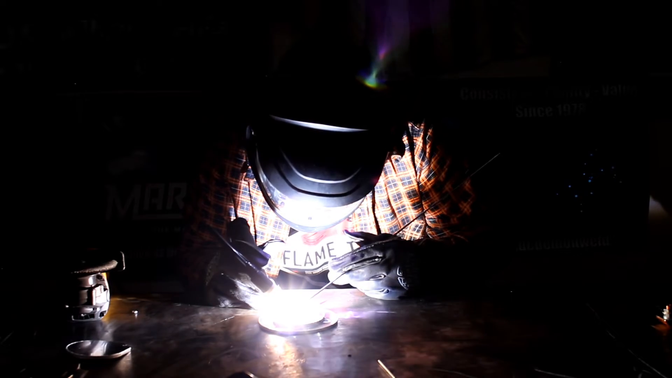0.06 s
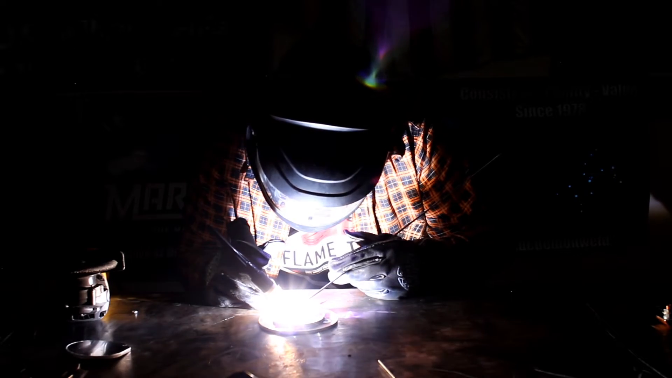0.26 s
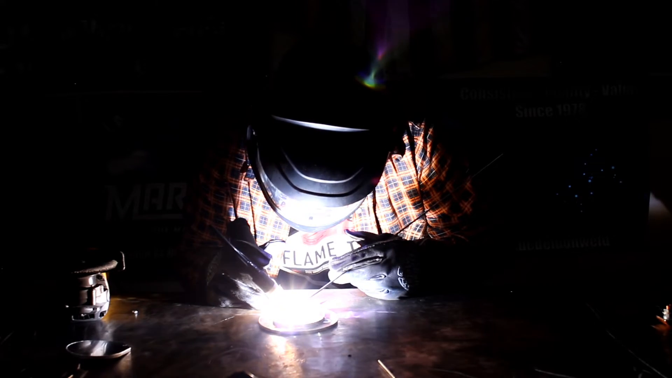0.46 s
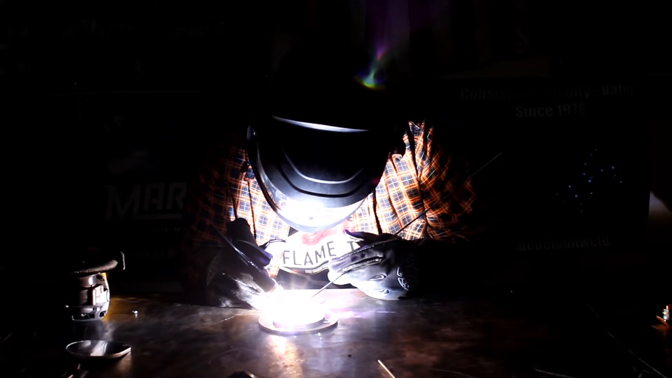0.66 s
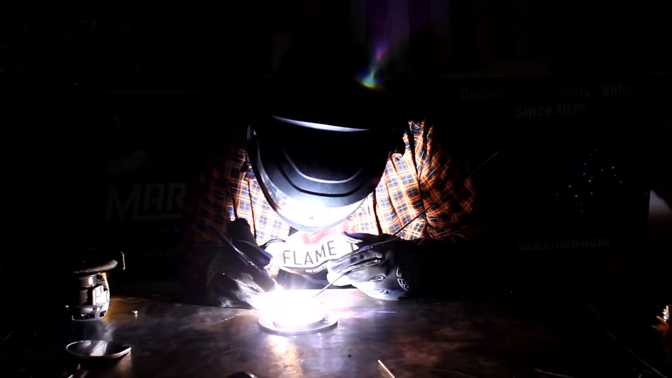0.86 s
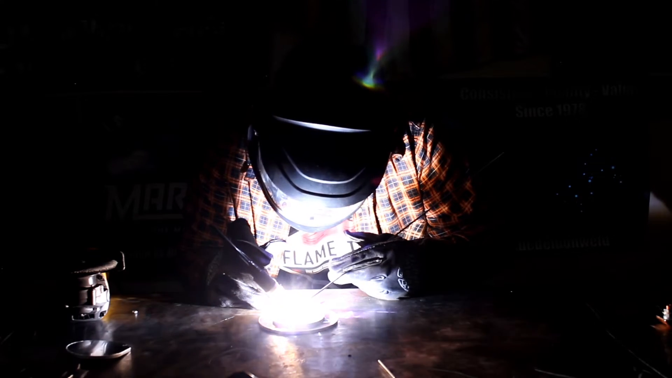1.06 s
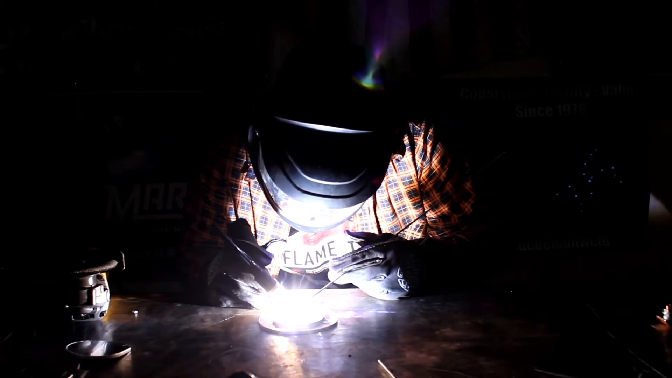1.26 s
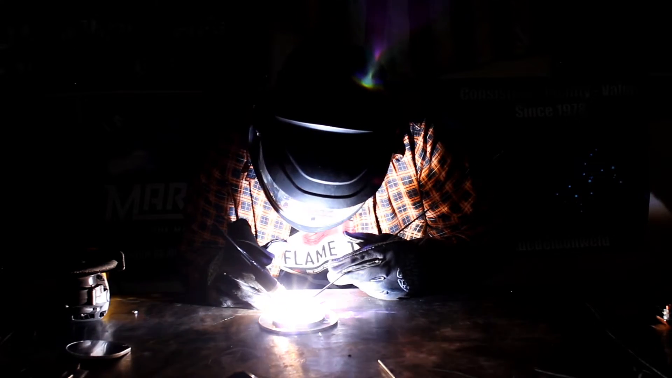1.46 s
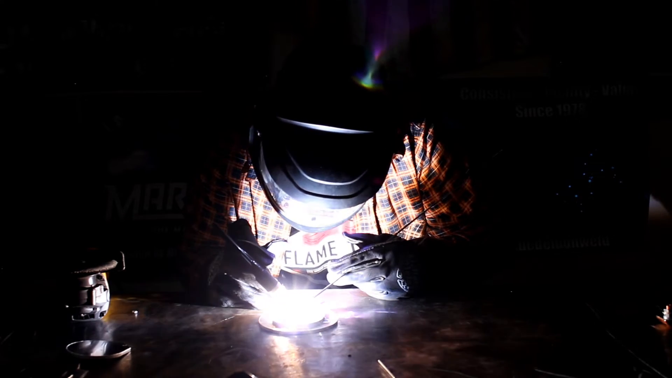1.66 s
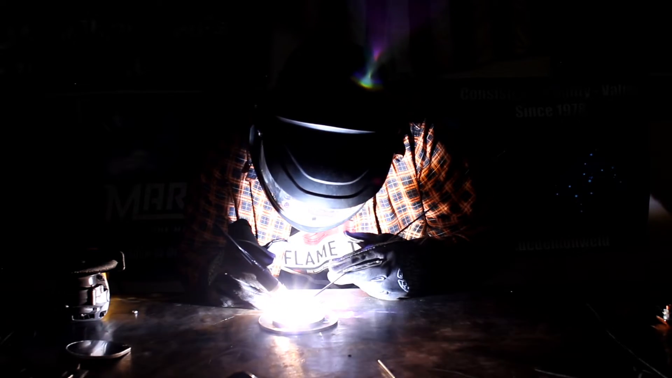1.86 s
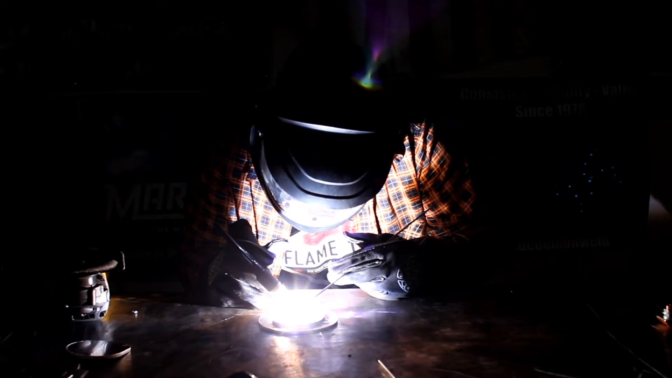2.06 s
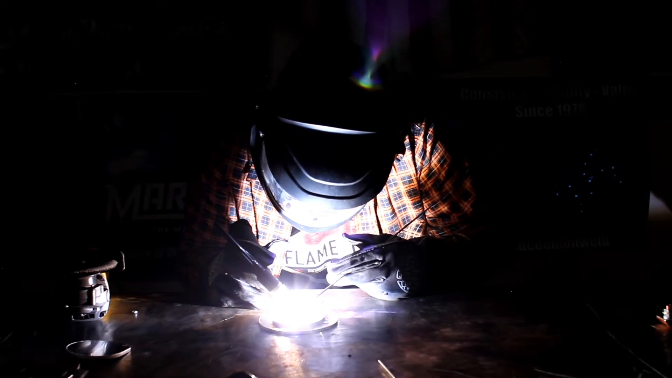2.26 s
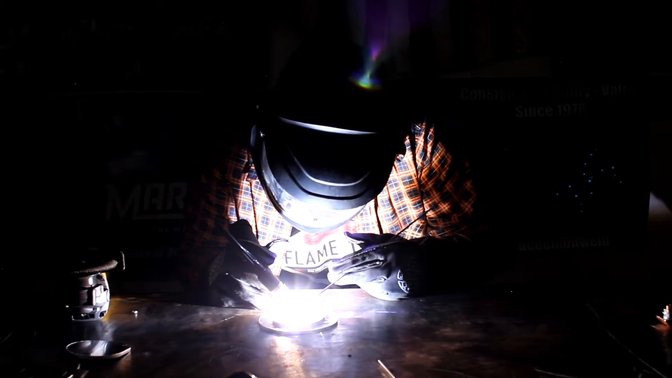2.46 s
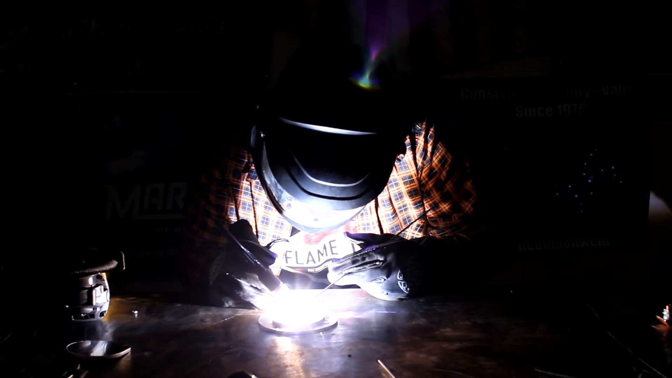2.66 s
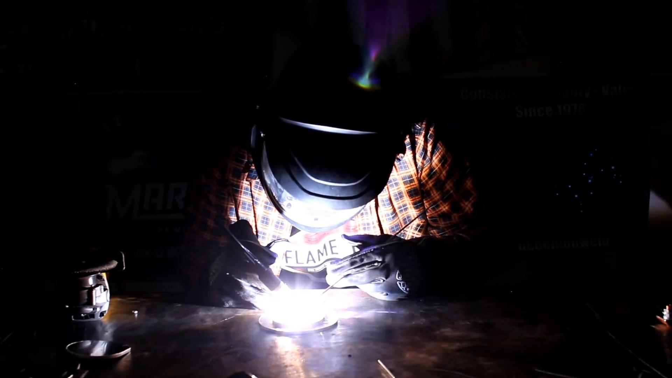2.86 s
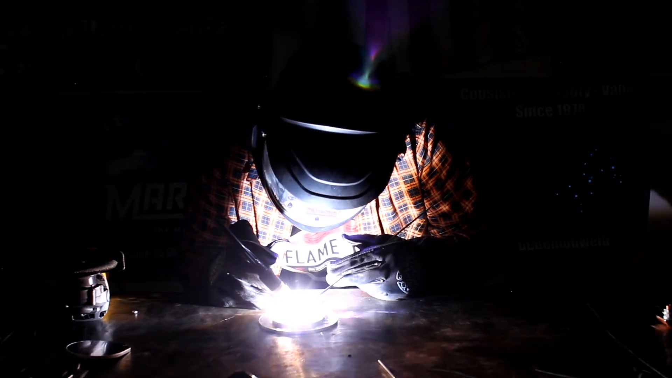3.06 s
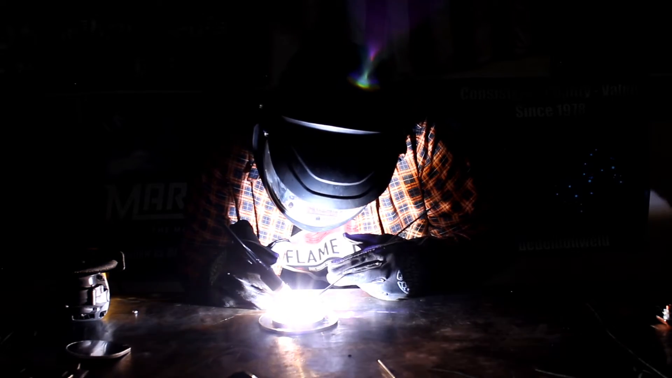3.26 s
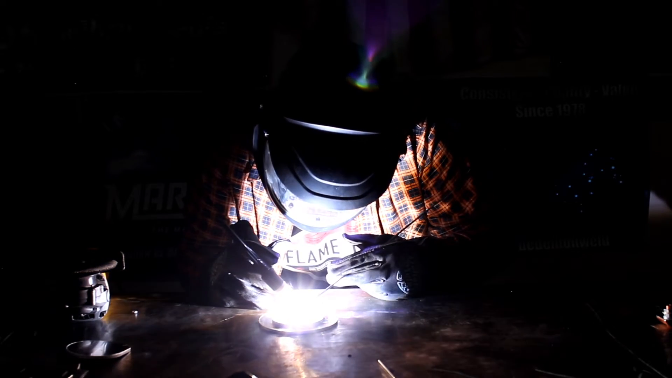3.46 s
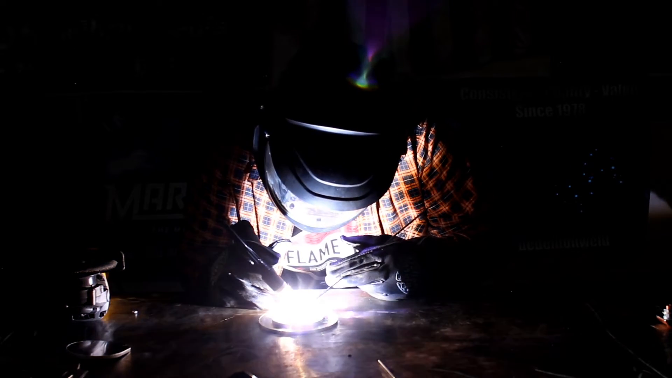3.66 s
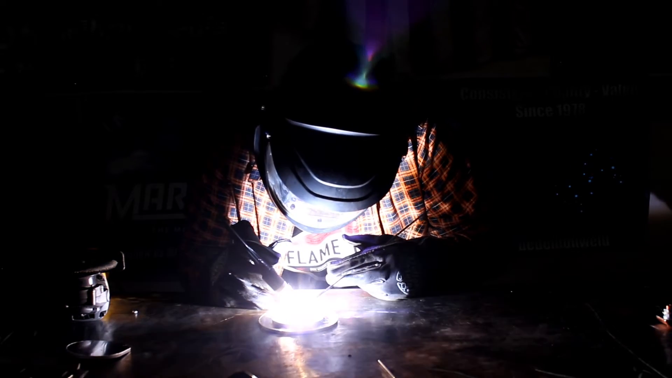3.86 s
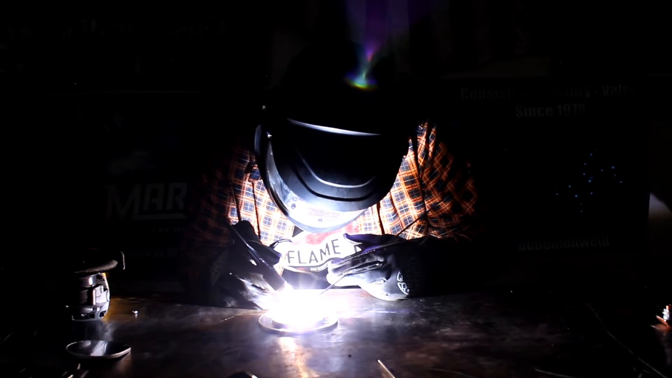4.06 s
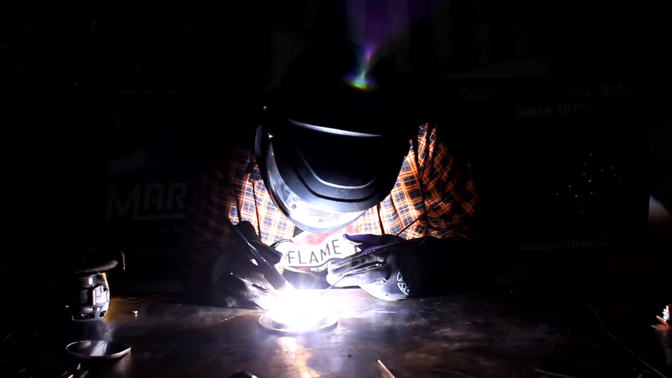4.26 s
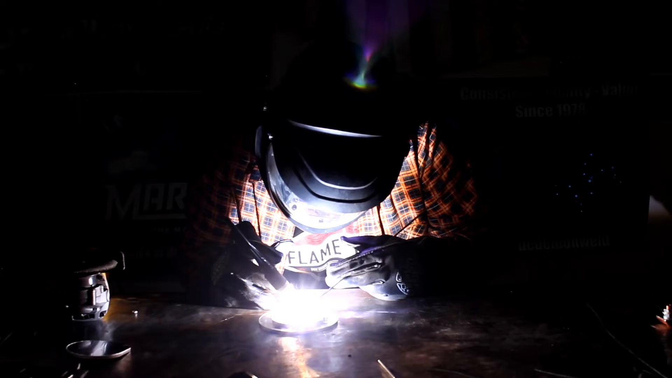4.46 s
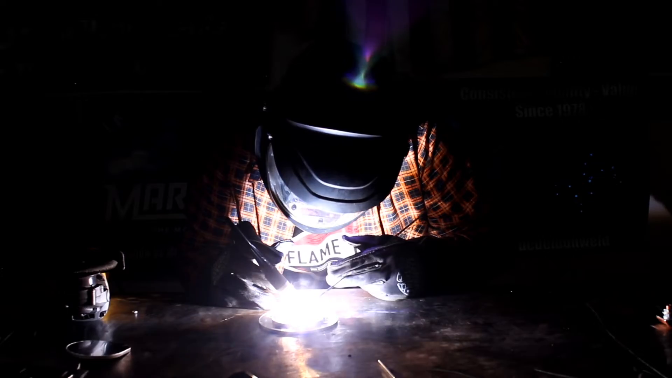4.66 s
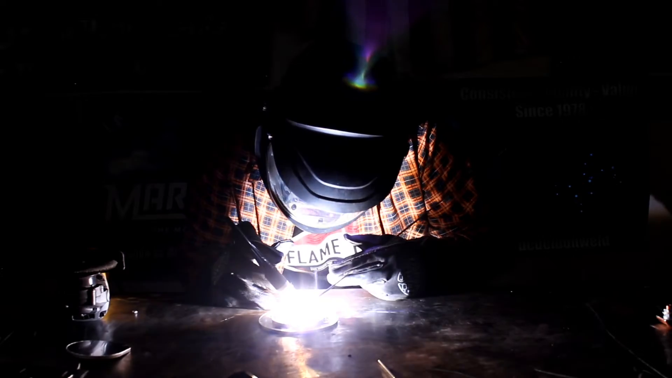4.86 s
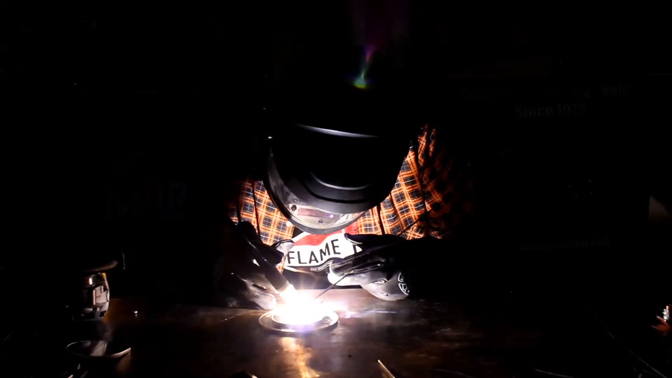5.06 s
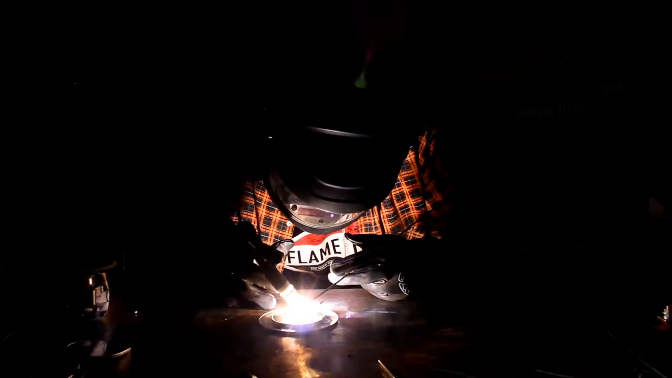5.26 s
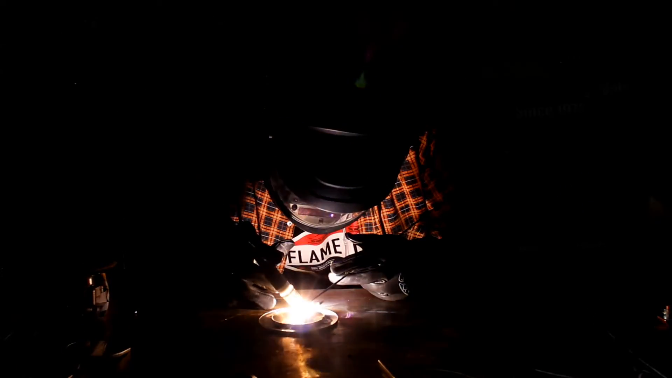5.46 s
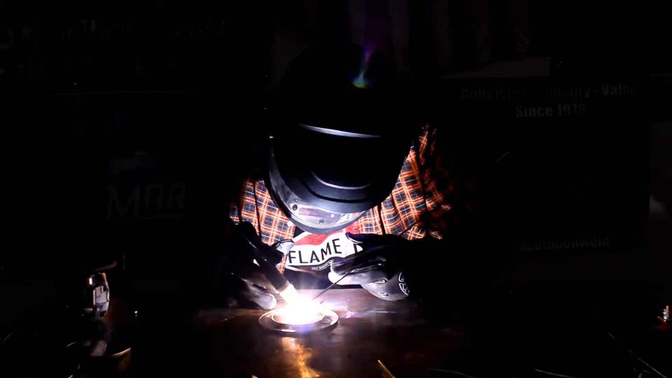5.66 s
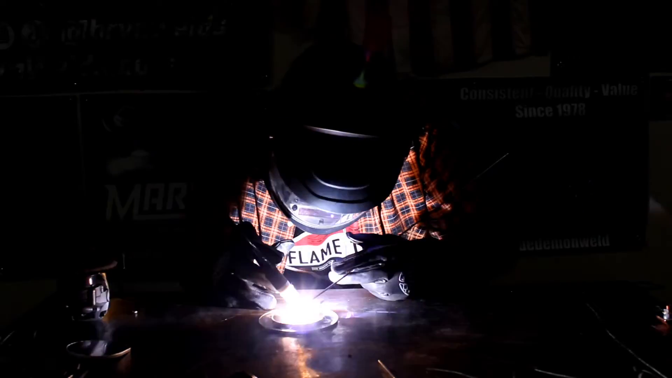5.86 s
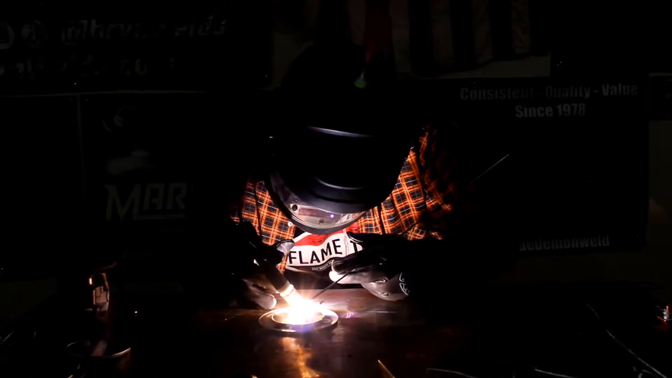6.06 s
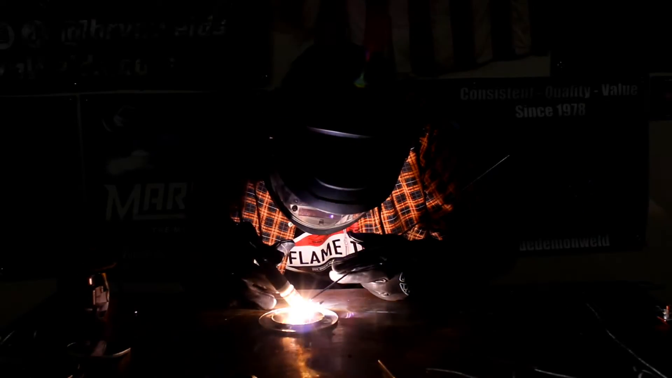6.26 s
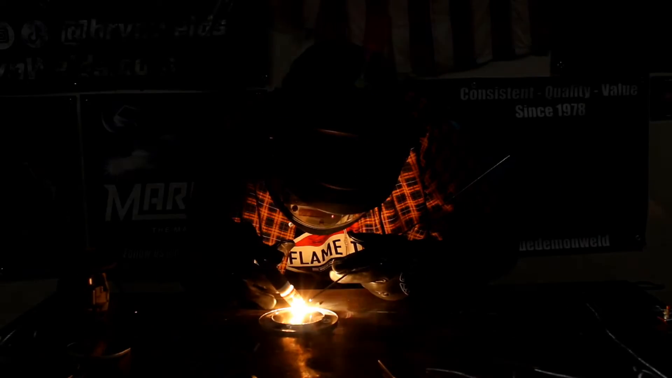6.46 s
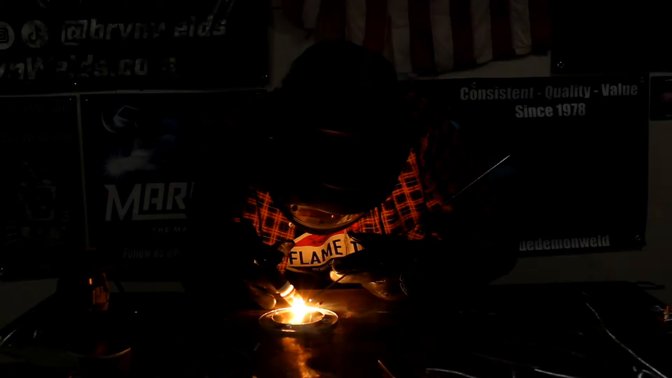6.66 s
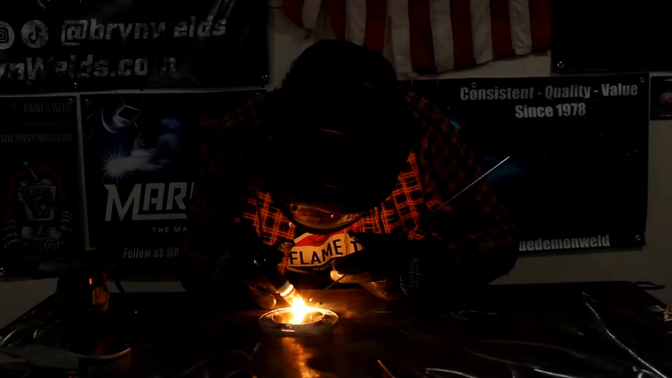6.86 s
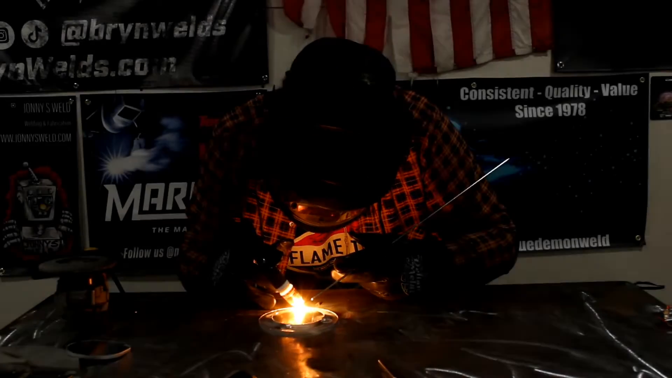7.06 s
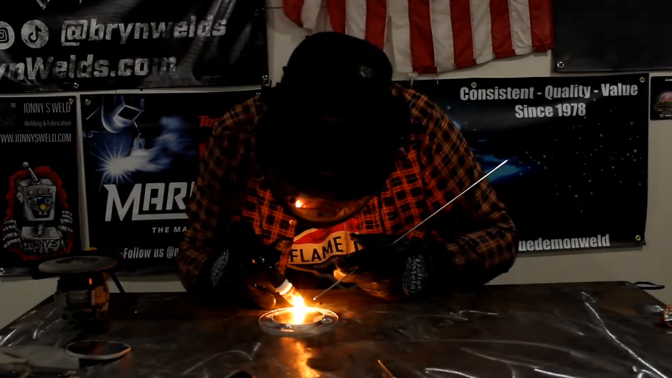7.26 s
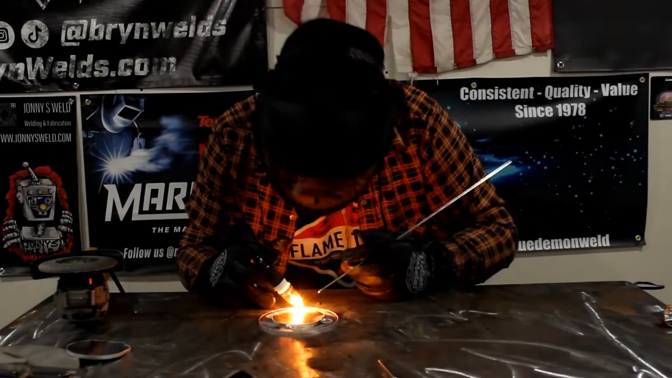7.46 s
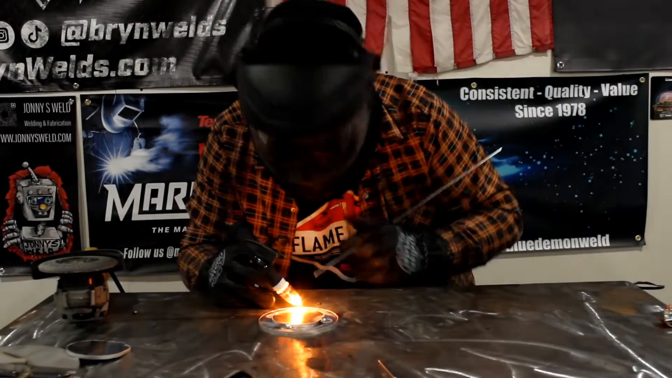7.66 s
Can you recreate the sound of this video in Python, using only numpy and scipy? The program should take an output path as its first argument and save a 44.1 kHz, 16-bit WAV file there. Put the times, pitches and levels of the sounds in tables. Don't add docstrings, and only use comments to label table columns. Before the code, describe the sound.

Close in a workshop, an electric arc buzzes continuously, hard-edged and metallic, dipping slightly now and then, with scattered pops. It suddenly weakens into a hollow, irregular sputter full of loud spitting sparks, settles into a thinner buzz, then snaps off. Short room reverberation fades while the fan of the machine swells up from the background. Thin, bright microphone sound.

```python
import sys
import numpy as np
from scipy import signal
from scipy.fft import rfft, irfft, next_fast_len
from scipy.io import wavfile
from scipy.ndimage import uniform_filter1d

SR = 44100
rng = np.random.default_rng(int(sys.argv[2]) if len(sys.argv) > 2 else 0)


def convert_level_to_amplitude(level_db):
    exponent = np.asarray(level_db, float) / 20
    return 10 ** exponent


def dump_mix(stems):
    frames = np.atleast_2d(stems).T
    limited = np.clip(frames, -1, 1)
    pcm = np.round(limited * 32767).astype(np.int16)
    wavfile.write(sys.argv[1], SR, pcm)


N = 340893
T = np.arange(N) / SR

CYCLE_HZ = 90.193
OUT_S = 6.441
DUCK_OUT_DB, RELEASE_S = 18, 6.495
# [delay/ms, level/dB]
BENCH = [(.24, -16), (.45, -9), (.87, -10), (1.3, -13), (1.88, -7), (2.38, -11), (2.75, -12), (3.4, -15)]
# [f/Hz, density/dB per Hz]
CRACK = [(1180, -32.5), (2000, -14), (2200, -9), (2530, -3.5), (2750, 4), (3350, -3), (3650, -2.5),
         (3980, 0), (4560, -3), (4930, -3), (6270, 10.5), (7070, 0.5), (15600, -13)]


def unit(x):
    return x / np.sqrt(np.mean(x ** 2) + 1e-20)


def along(points, hz):
    f, v = np.transpose(points)
    return np.interp(np.log(hz + 1), np.log(f + 1), v)


def curves(rows):
    s, *cols = np.transpose(rows)
    return [np.interp(T, s, c) for c in cols]


def wobble(rate):
    knots = rng.standard_normal(400)
    return np.interp(T * rate, np.arange(len(knots)), knots)


def filtered(x, response):
    m = next_fast_len(N + SR // 2)
    return irfft(rfft(x, m) * response(np.fft.rfftfreq(m, 1 / SR)), m)[:N]


def impulses(times, sizes):
    at = np.asarray(times) * SR
    taps = np.floor(at)[:, None] + np.arange(-7, 9)
    offset = taps - at[:, None]
    shape = np.sinc(offset) * np.cos(np.pi * offset / 16) ** 2
    index = np.clip(taps, 0, N).astype(int).ravel()
    return np.bincount(index, (shape * sizes[:, None]).ravel(), N + 1)[:N]


def noise(spectrum):
    return unit(filtered(rng.standard_normal(N), lambda hz: convert_level_to_amplitude(along(spectrum, hz))))


def bench(hz, echoes=BENCH):
    return 1 + sum(convert_level_to_amplitude(db) * np.exp(-2j * np.pi * hz * ms / 1000) for ms, db in echoes)


def click(spectrum, echoes=BENCH):
    return lambda hz: convert_level_to_amplitude(along(spectrum, hz)) / np.mean(convert_level_to_amplitude(along(spectrum, hz))) * bench(hz, echoes)


def cycles():
    first_strike_s = .00384
    tick_ms, tick_hz = .05, 16.399
    # [t/s, delay/ms]
    slip_table = [
        (5.21, 1.2),
        (5.46, .93),
        (5.7, .93),
        (5.95, .88),
        (6.225, 2.03),
    ]
    # [t/s, extra delay/ms]
    lean_table = [
        (0, -.12),
        (.3, -.03),
        (1, 0),
        (2.6, .12),
        (3.5, 0),
        (5, .03),
    ]
    late_ms = sum(ms * np.clip((T - s) * 200, 0, 1) for s, ms in slip_table)
    late_ms += curves(lean_table)[0]
    late_ms += tick_ms / 2 * signal.sawtooth(2 * np.pi * tick_hz * T, .15)
    return (T - first_strike_s - late_ms / 1000) * CYCLE_HZ


def loudness():
    fall_s, dulls = 0.02, 0.36
    # [t/s, loudness/dB, crackle over hum/dB]
    arc_table = [(0, -21, 0), (1.25, -19, 0), (1.9, -21.5, 0), (2.5, -19, -3), (2.9, -21, -3.5),
                 (4.1, -21, -2.5), (4.9, -23.5, -0.5), (5.0, -25, 0), (5.05, -24.5, 1), (5.16, -31, 6.5),
                 (5.28, -33.5, -3), (5.4, -31, -4), (5.9, -32, -1), (6.156, -26.5, -2.5), (6.24, -33, -2.5),
                 (6.324, -28, 1), (6.43, -26, -6)]
    # [t/s, depth/dB, recovery/s]
    sag_table = [(.16, -1.5, 0.039), (.5, 2.5, 0.36), (.77, 0, 0.19), (1.02, 4.5, 0.15), (1.43, 1, 0.09),
                 (1.565, 3.5, .08), (1.97, 1.5, 0.073), (2.16, 4, 0.045), (2.29, 2, 0.11),
                 (2.54, 2.5, 0.14), (3.0, 0.5, 0.061), (3.4, 1.5, 0.45), (3.67, 0, 0.26),
                 (4.3, -0.5, 0.085), (5.97, 4.5, 0.1), (6.215, -0.5, 0.079), (6.375, 6, .2)]
    level_db, harsh_db = curves(arc_table)
    sag_db = sum(np.interp(T, [s, s + fall_s, s + fall_s + back_s], [0, db, 0]) for s, db, back_s in sag_table)
    return level_db - sag_db, level_db + harsh_db - (1 + dulls) * sag_db


def struck():
    # [t/s, half length/s]
    misfire_table = [
        (.182, .005),
        (5.022, .004),
    ]
    return 1 - sum(0.85 * np.exp(-((T - s) / half_s) ** 4) for s, half_s in misfire_table)


def partial(k, turns, low):
    # [delay after strike/ms, signed size full current, signed size low current]
    step_table = [(-.4, -.8, .4), (0, -.7, -1), (.3, .6, 0), (.5, -.3, -.4), (.9, 0, .5), (1.55, -.6, 0),
                  (1.8, .4, -.3), (4.8, -.5, 0), (6.75, .8, -.5), (7.2, .8, 0), (7.6, -.8, 0), (8.6, .6, 0)]
    inverted = (2, 6)
    ms, full, weak = np.transpose(step_table)
    turn = np.exp(-2j * np.pi * k * CYCLE_HZ * ms / 1000)
    full_angle = np.angle(full @ turn) + 0.5 * rng.standard_normal() + np.pi * (k in inverted)
    angle = (1 - low) * full_angle + low * np.angle(weak @ turn)
    return np.cos(2 * np.pi * k * turns + angle + 0.2 * wobble(12))


def hum(turns, low):
    # [harmonic, level/dB]
    early_table = [(1, -35.5), (2, -13), (3, -14.5), (4, -14), (5, -2.5), (6, -5), (7, 1.5), (8, -7),
                   (9, -24), (10, -19.5), (11, -11), (12, -33), (13, -45), (14, -30), (15, -16.5),
                   (16, -20.5), (17, -19), (18, -16.5), (19, -18), (20, -13.5), (21, -21), (22, -6),
                   (23, -15.5), (24, -63), (25, -5.5), (26, -9), (27, -10), (28, -2), (29, -13),
                   (30, -14.5)]
    # [harmonic, level/dB]
    late_table = [(1, -34.5), (2, -11), (3, -14.5), (4, -11), (5, -2.5), (6, -6), (7, 2), (8, -5), (9, -23),
                  (10, -19.5), (11, -11.5), (12, -18.5), (13, -36), (14, -20), (15, -13.5), (16, -14),
                  (17, -17), (18, -15.5), (19, -13), (20, -14.5), (21, -19), (22, -6.5), (23, -18.5),
                  (24, -30), (25, -7), (26, -18), (27, -11), (28, -4), (29, -1), (30, -19)]
    # [harmonic, level/dB]
    sputter_table = [(1, -41), (2, -16), (3, -17), (4, -0.5), (5, -7), (6, 1), (7, 1), (8, -2.5), (9, -3.5),
                     (10, -27), (11, 0), (12, -22), (13, -5), (14, -8), (15, -11), (16, -8), (17, -19),
                     (18, -21), (19, -24), (20, -1), (21, -27), (22, -6), (23, -32), (24, -34), (25, -39),
                     (26, -28), (27, -8), (28, -21), (29, -29), (30, -29)]
    # [harmonic, level/dB]
    settled_table = [(1, -37), (2, -15.5), (3, -8), (4, -24), (5, -9), (6, 0), (7, -0.5), (8, -9), (9, -4),
                     (10, -21), (11, -13), (12, -4), (13, -14), (14, -17), (15, 2), (16, -10), (17, -2),
                     (18, -5), (19, -17), (20, 4.5), (21, -25), (22, -9), (23, -31), (24, -33), (25, -38),
                     (26, -32), (27, -32), (28, -36), (29, -30), (30, -35)]
    out = np.zeros(N)
    stages = zip(early_table, late_table, sputter_table, settled_table)
    for (k, early_db), (_, late_db), (_, sputter_db), (_, low_db) in stages:
        db = np.interp(T, [2.2, 4.0, 5.08, 5.22, 5.95, 6.05],
                       [early_db, late_db, late_db, sputter_db, sputter_db, low_db])
        out += convert_level_to_amplitude(db + 1.16 * wobble(7)) * partial(round(k), turns, low)
    return out / np.sqrt(abs(uniform_filter1d(out ** 2, SR // 4)))


def scattered(x):
    level_db, t60_s, corner_hz = -5, .014, 7000
    dying = convert_level_to_amplitude(-60 * T[:SR // 25] / t60_s)
    envelope = signal.fftconvolve(abs(x), dying / np.linalg.norm(dying))[:N]
    hiss = envelope * rng.standard_normal(N)
    return x + convert_level_to_amplitude(level_db) * filtered(hiss, lambda hz: hz ** 4 / (hz ** 4 + corner_hz ** 4))


def harmonic_balance(column):
    width_hz = 38
    # [harmonic, gain torch far/dB, gain torch moved on/dB]
    balance_table = [(29, -9, -9), (30, 0, 3), (31, 9, 6), (32, 3, 1), (33, 11, 5), (34, 9, 3), (35, -6, -8),
                     (37, -4, -4), (38, -3, -1), (39, 13, 6), (41, 2, 3), (42, -2, -7), (43, -1, -6),
                     (44, 9, 6), (45, 0, 3), (46, 2, 4), (47, -1, -5), (48, 0, -8), (49, 2, -4), (50, 6, 3),
                     (51, 1, -3), (52, -6, -2), (53, -6, -4), (54, -2, 6), (55, 14, 4), (56, -2, -13),
                     (57, 18, 0), (58, 4, -6), (59, 3, -2), (60, 8, 4), (61, 0, 3), (62, 6, 9), (64, -4, -3),
                     (67, 20, 5), (69, -15, -9), (70, -9, 6), (71, -5, 0), (72, 7, 7), (73, 3, 4),
                     (74, -11, -6), (75, -7, -2), (76, -9, -2), (77, -4, 6), (78, 7, 9),
                     (80, 9, 7), (81, -1, -7), (82, 2, -13), (83, 14, 0), (84, -1, -6), (85, 7, 1),
                       (86, 14, 13), (87, 1, 3), (88, 6, 3), (90, 12, 3), (91, 13, -6), (93, 3, 11),
                       (94, -4, -1), (95, 2, 3), (96, 6, 2), (97, -3, -10), (98, 3, -8), (99, -3, -6),
                       (100, 4, 3), (101, -5, 1), (102, -15, -7), (103, -3, 4), (104, -8, 0), (105, -4, -2),
                       (107, -3, -5), (108, 3, 3), (109, 6, 3), (110, 11, 14), (111, 3, 4), (112, -4, -4),
                       (113, 4, 1), (114, 3, -3), (115, 13, 0), (116, 6, 3), (117, -8, -4), (119, 2, 7),
                       (120, 4, 1), (121, 9, 9), (123, 4, 2), (124, -8, -9)]
    rows = np.array(balance_table)
    return lambda hz: 1 + sum((convert_level_to_amplitude(row[column]) - 1) * np.exp(-((hz - row[0] * CYCLE_HZ) / width_hz) ** 2)
                              for row in rows)


def crackle(turns, low, travel):
    rising_gains_db = 1.5
    dull_hz = 5000
    # [delay/ms, sign, full current/dB, low current/dB, scatter/ms, scatter/dB]
    strike_table = [
        (0, -1, 0, 6, 0.007, 1.0),
        (4.7, -1, -5, -9, 0.009, 1.0),
        (6.7, 1, -1, -30, 0.008, 1.3),
        (6.7, -1, -30, -2, 0.015, 2.5),
    ]
    # [f/Hz, density/dB per Hz]
    late_spectrum = [(1180, -29), (2000, -13), (2300, -4), (2610, -21), (3000, -2), (3650, -4.5), (4450, 3),
                     (5300, -2), (6500, 1.5), (7300, -2), (8200, -4), (13000, -14.5), (15600, -15.5)]
    # [f/Hz, density/dB per Hz]
    low_spectrum = [(900, -22), (1350, -4), (1800, -5.5), (2300, -16), (3600, -2), (4600, -9.5), (5500, -1),
                    (6500, -3.5), (15600, -18)]
    # [delay/ms, level/dB]
    late_echoes = [(.22, -28), (.46, -30), (.9, -21.5), (1.35, -4), (1.85, -18), (2.38, -18), (2.7, -19),
                   (3.4, -18)]
    start = np.interp(np.arange(-1, turns[-1] - 1), turns, T)
    start_low = np.interp(start, T, low) ** 2
    train = np.zeros(N)
    for ms, sign, full_db, low_db, scatter_ms, scatter_db in strike_table:
        luck = rng.standard_normal((len(start), 2))
        db = full_db + (sign > 0) * rising_gains_db * start
        db = db + start_low * (low_db - full_db) + scatter_db * luck[:, 1]
        train += impulses(start + (ms + scatter_ms * luck[:, 0]) / 1000, np.sign(sign) * convert_level_to_amplitude(db))
    train = scattered(train)
    early = unit(filtered(train, click(CRACK)))
    late = unit(filtered(train, click(late_spectrum, late_echoes)))
    early = filtered(early, harmonic_balance(column=1))
    late = filtered(late, harmonic_balance(column=2))
    sharp = np.cos(np.pi / 2 * travel) * early + np.sin(np.pi / 2 * travel) * late
    weak = filtered(train, click(low_spectrum, late_echoes))
    sharp = (1 - low) * sharp + low * convert_level_to_amplitude(3.0) * unit(weak)
    starved = low * np.clip((6.0 - T) / 0.094, 0, 1)
    return (1 - starved) * sharp + starved * filtered(sharp, lambda hz: 1 / (1 + (hz / dull_hz) ** 2))


def singing(lines, turns, low):
    return unit(sum(convert_level_to_amplitude(db + 2.4 * wobble(9)) * partial(round(hz / CYCLE_HZ), turns, low) for hz, db in lines))


def arc():
    # [f/Hz, density/dB per Hz]
    roar_spectrum = [(24, -45), (60, -49), (171, -23.5), (400, -15.5), (442, -17), (627, -8), (825, -19),
                     (983, -16), (1260, -13), (2480, -16), (3270, -14.5), (6260, -17.5), (15800, -35)]
    # [f/Hz, density/dB per Hz]
    low_roar_spectrum = [(24, -70), (40, -45), (351, -1.5), (485, 0), (536, 8.5), (862, -13), (1000, -1),
                         (2860, -13), (6510, -13), (13400, -22), (15600, -29)]
    # [f/Hz, level/dB]
    singing_lines = [(3517, -48), (3607, -48), (3067, -51), (5141, -45), (5410, -43), (5593, -45),
                     (6043, -47), (6315, -45), (6492, -44), (6767, -45), (7036, -47), (7488, -42),
                     (7666, -47), (7215, -51)]
    # [t/s, swell/dB, half length/s]
    flare_table = [(5.209, 9, 0.011), (5.235, 8, .008), (5.315, 6, .015), (5.357, 8, 0.014),
                   (5.42, 6.5, .03), (5.47, 3, .01), (5.52, 2, 0.0073), (5.564, 8, .018), (5.605, 5, 0.016),
                   (5.69, 7, 0.016), (5.73, 3, .012), (5.803, 3, .02), (5.85, 4.5, .02), (5.947, 1, .02)]
    hum_db, crackle_db = loudness()
    turns = cycles()
    travel = np.clip((T - 1.6) / 3, 0, 1)
    low = np.clip((T - 5.05) / 0.15, 0, 1)
    settled = np.clip((T - 5.95) / 0.079, 0, 1)
    burning = np.clip((OUT_S - T) / 0.0027, 0, 1)
    fading = convert_level_to_amplitude(-60 * np.clip(T - OUT_S, 0, None) / 0.18)
    pulsing = 1 + 0.33 * np.cos(4 * np.pi * (turns - .08))
    puffing = 0.61 * np.exp(1.34 * np.cos(2 * np.pi * (turns - .25)))
    flare_db = sum(db * np.exp(-((T - s) / half_s) ** 2) for s, db, half_s in flare_table)
    unsteady = convert_level_to_amplitude(hum_db + 2.2 * wobble(18)) * pulsing
    full_roar = convert_level_to_amplitude(-12) * (1 - low) * noise(roar_spectrum)
    low_roar = convert_level_to_amplitude(flare_db - 6.5) * low * puffing * noise(low_roar_spectrum)
    fizz = convert_level_to_amplitude(crackle_db - 24) * pulsing * low * noise(CRACK)
    roar = unsteady * (full_roar + low_roar) + fizz
    upper = convert_level_to_amplitude(-7.0) * settled * singing(singing_lines, turns, 0.54)
    tonal = convert_level_to_amplitude(hum_db - 2.5) * hum(turns, low) + convert_level_to_amplitude(crackle_db) * upper
    restrikes = convert_level_to_amplitude(crackle_db - 3.0) * crackle(turns, low, travel) * struck()
    return fading * struck() * tonal, burning * (restrikes + roar)


def sparks():
    sputter_push_db = -27.5
    push_low_hz = 350
    sizzle_db, sizzle_t60_s = -15, .016
    # [t/s, peak/dB, push relative to peak/dB]
    pop_table = [(0.1804, -17, 1), (0.4976, -12, -7), (1.0081, -4, -8), (1.5618, -14, -1), (1.652, -6, -20),
                 (1.697, -17, 0), (2.2423, -15, -12), (2.538, -14, -1.5), (3.9118, -15, -10),
                 (4.8217, -9.5, -10), (5.0314, -11.5, -8.5), (5.1207, -9, -11.5), (5.142, -7, -34),
                 (5.1544, -8, -36), (5.1765, -11, -28), (6.133, -12, -12), (6.2147, -16, -23),
                 (6.24, -11, -12), (6.2916, -12, -19), (6.3715, -12, -32)]
    # [t/s, peak/dB, gap/ms, second re first/dB]
    sputter_table = [(5.2031, -2.5, 7.8, -0.5), (5.2265, -7, 7.7, -7), (5.267, -10, 14, -15),
                     (5.3223, -10, 5.5, -12), (5.3383, -8.5, 8.4, 1.5), (5.3577, -6, 10, -15),
                     (5.4396, -12, 9.9, -1), (5.4625, -3.5, 6.6, -2), (5.526, -17, 10, 4),
                     (5.5743, -3.5, 9, -6), (5.4515, -14, 4.4, 0), (5.4795, -16, 6.7, -9),
                     (5.5305, -17, 10, 2), (5.5875, -10, 28, -4), (5.5982, -8, 6.9, 2),
                     (5.6606, -16, 3.9, -2), (5.699, -4.5, 10, -2), (5.7234, -7.5, 8.2, 2),
                     (5.8192, -16, 4.8, 1), (5.8352, -5, 6, -21), (5.8471, -5, 7.8, 0.5),
                     (5.8985, -49, 5.2, -7), (5.9479, -4.5, 7.5, -1.5), (5.9714, -7, 7.6, 1),
                     (6.4398, -0.5, 7.5, -5), (6.4564, -19, 5.9, -9)]
    # [f/Hz, density/dB per Hz]
    spark_spectrum = [(590, -85), (1000, -6.5), (1740, 0), (2820, -7.5), (4470, 0), (5020, -2.5),
                      (6540, 5.5), (7170, 0.5), (13400, -11.5), (15700, -15.5)]
    pop_s, pop_db, pop_push_db = np.transpose(pop_table)
    first_s, first_db, gap_ms, second_db = np.transpose(sputter_table)
    s = np.concatenate([pop_s, first_s, first_s + gap_ms / 1000])
    db = np.concatenate([pop_db, first_db, first_db + second_db])
    push_db = np.concatenate([pop_db + pop_push_db, np.full(2 * len(sputter_table), sputter_push_db)])
    train = impulses(s + 0.000943, convert_level_to_amplitude(db + 2.5))
    dying = convert_level_to_amplitude(sizzle_db - 60 * T[:SR // 20] / sizzle_t60_s)
    sizzle = signal.fftconvolve(train, dying)[:N] * noise(spark_spectrum)
    fuller = filtered(train * (T < 5), click(CRACK))
    crack = .5 * fuller + filtered(train, click(spark_spectrum)) + sizzle
    u = np.arange(300) / SR / 0.000098
    pulse = (1 - u / 2) * u * np.exp(1 - u)
    push = signal.fftconvolve(impulses(s + 0.000891, -convert_level_to_amplitude(push_db + 13.5)), pulse)[:N]
    return crack + filtered(push, lambda hz: bench(hz) * (1j * hz / (push_low_hz + 1j * hz)) ** 2)


def shop(x):
    # [f/Hz, t60/s]
    decay_table = [(300, 0.94), (2500, 0.92), (5000, 0.5), (12000, 0.31)]
    hz, t, z = signal.stft(rng.standard_normal(SR // 2), SR, nperseg=256)
    tail = signal.istft(z * convert_level_to_amplitude(-60 * t / along(decay_table, hz)[:, None]), SR, nperseg=256)[1]
    return signal.fftconvolve(np.pad(x, (300, 0)), tail / np.linalg.norm(tail))[:N]


def ducking():
    full_db, low_db, release_takes_s = 21, 15, 0.8
    held = np.interp(T, [5, 5.4, OUT_S, RELEASE_S], [full_db, low_db, low_db, DUCK_OUT_DB])
    return held * np.cos(np.pi / 2 * np.clip((T - RELEASE_S) / release_takes_s, 0, 1)) ** 2


def fan():
    level_db, flutter_db = -24.5, 2.2
    # [f/Hz, density/dB per Hz]
    rush_spectrum = [(24, -82), (40, -32.5), (229, -16.5), (360, -13.5), (413, -20), (473, -15), (621, -8),
                     (695, -11.5), (999, -19), (1250, -16), (1570, -22.5), (2590, -24.5), (4770, -34.5),
                     (9000, -41), (11700, -76), (19800, -120)]
    # [f/Hz, level/dB]
    blade_table = [(236.9, -37.5), (397.5, -35), (422.5, -28.5), (516, -45), (619.1, -23), (657, -30.5),
                   (1125, -37), (1211, -42), (1314, -61), (1690, -39), (1857, -37.5), (2767, -58)]
    # [f/Hz, density/dB per Hz]
    gas_spectrum = [(4120, -31), (7000, -5), (8210, -8), (9200, -2), (11300, -6), (12700, -7), (14200, 6),
                    (15000, -2), (15700, -17.5)]
    top_db = max(db for _, db in blade_table)
    tones = np.zeros(N)
    for hz, db in blade_table:
        level = convert_level_to_amplitude(db - top_db + flutter_db * wobble(22))
        tones += level * np.sin(2 * np.pi * hz * T + 0.42 * wobble(14))
    rush = noise(rush_spectrum) * convert_level_to_amplitude(1.1 * wobble(7.3)) + convert_level_to_amplitude(-22.5) * noise(gas_spectrum)
    return convert_level_to_amplitude(level_db - ducking()) * unit(rush + convert_level_to_amplitude(-1.5) * unit(tones))


def scene():
    tonal, rough = arc()
    bursts = sparks()
    lifted = convert_level_to_amplitude(.6 * (DUCK_OUT_DB - ducking()) * (T > RELEASE_S))
    room = lifted * shop(convert_level_to_amplitude(-6) * rough + convert_level_to_amplitude(-7.0) * bursts)
    return (tonal + rough + bursts + room + fan())[None]


def top_cut(x):
    return signal.sosfilt(signal.butter(12, 16530, fs=SR, output="sos"), x)


def record(dry):
    low_hz, top_hz, overload = 95, 15750, .96
    mic = filtered(dry[0], lambda hz: (1j * hz / (low_hz + 1j * hz)) ** 2 * (hz < top_hz))
    mic = mic / (1 + abs(mic / overload) ** 8) ** (1 / 8)
    return top_cut(mic[None])


dry = scene()
out = record(dry)
dump_mix(out)
```